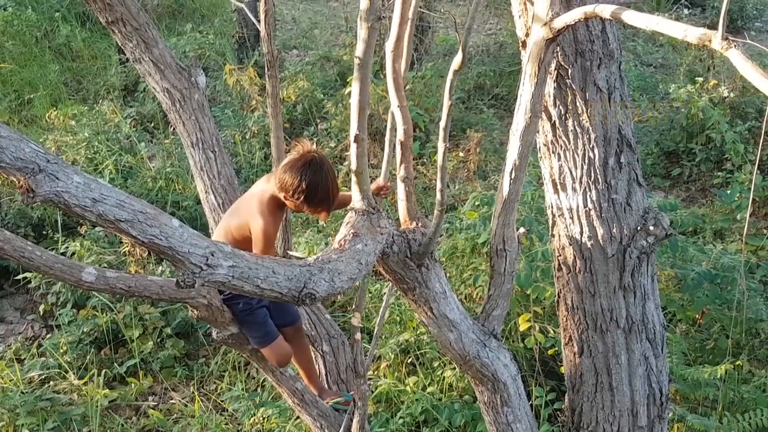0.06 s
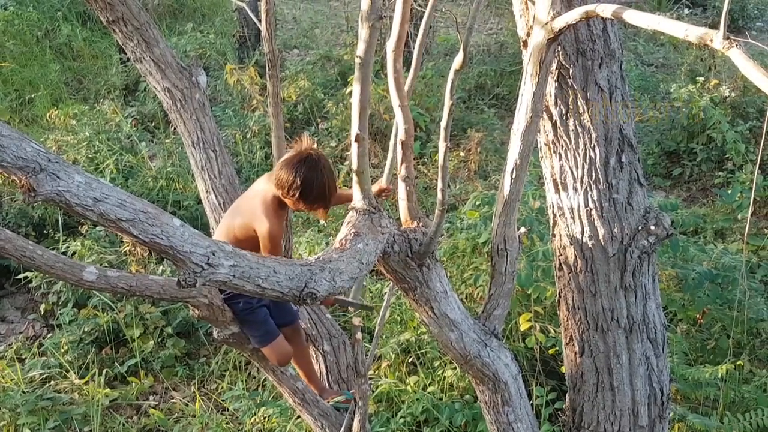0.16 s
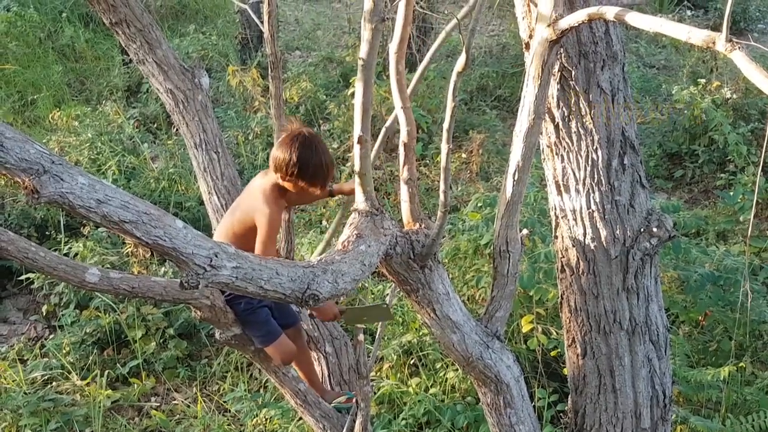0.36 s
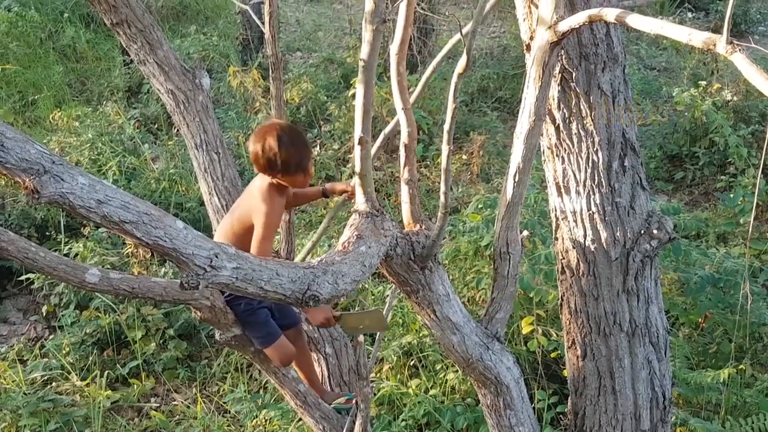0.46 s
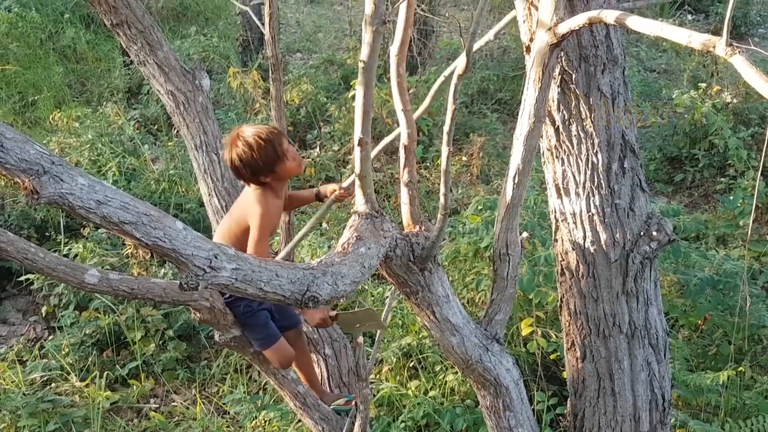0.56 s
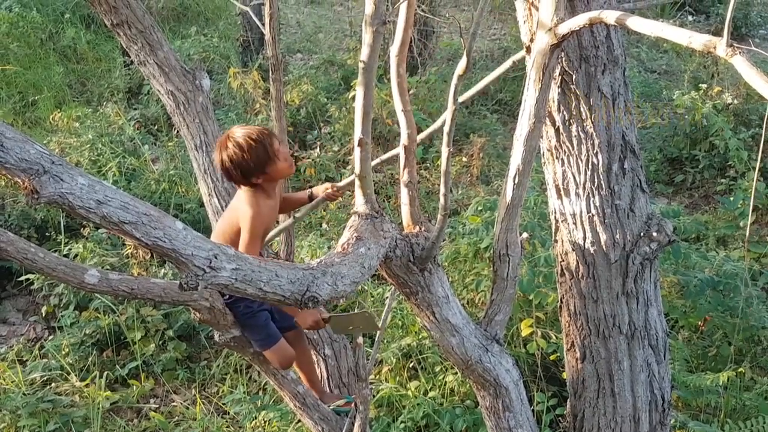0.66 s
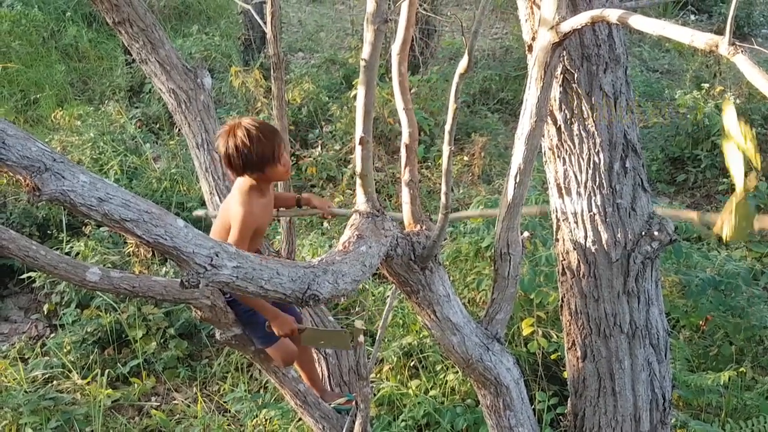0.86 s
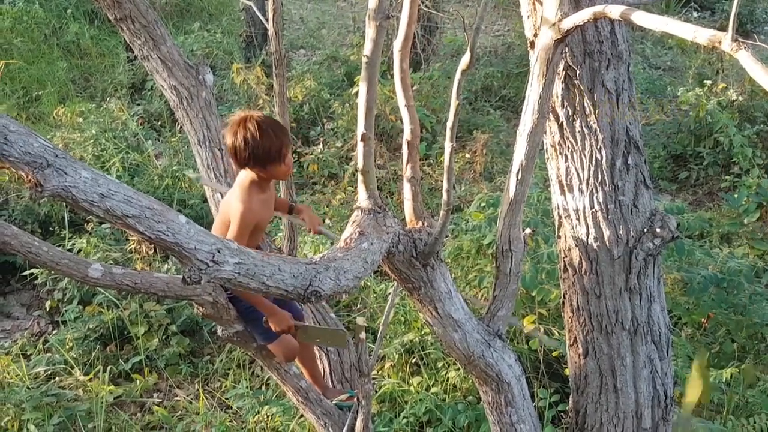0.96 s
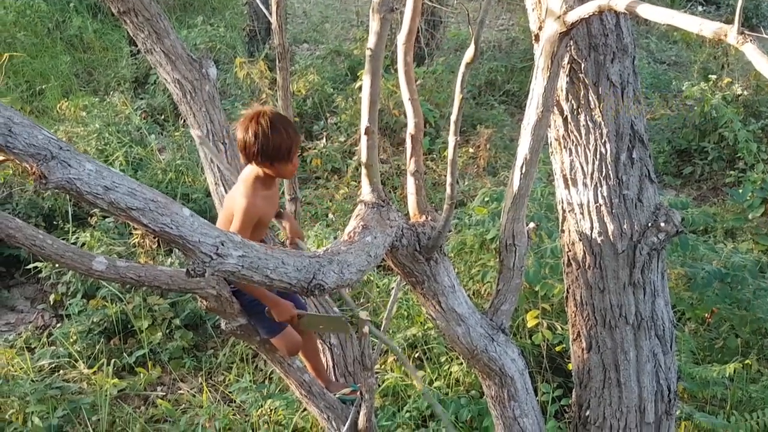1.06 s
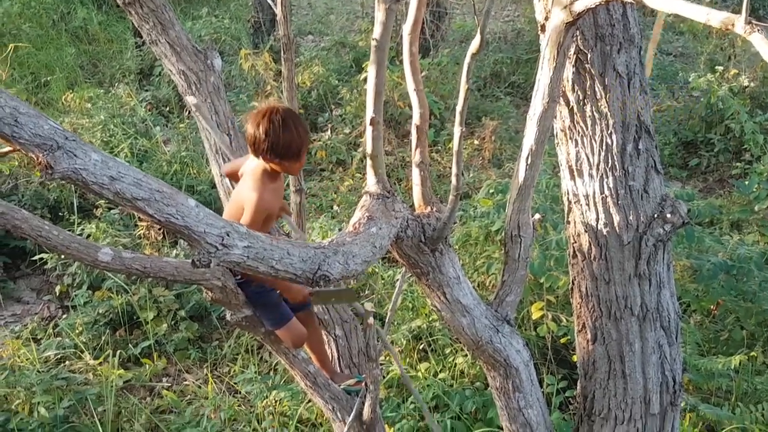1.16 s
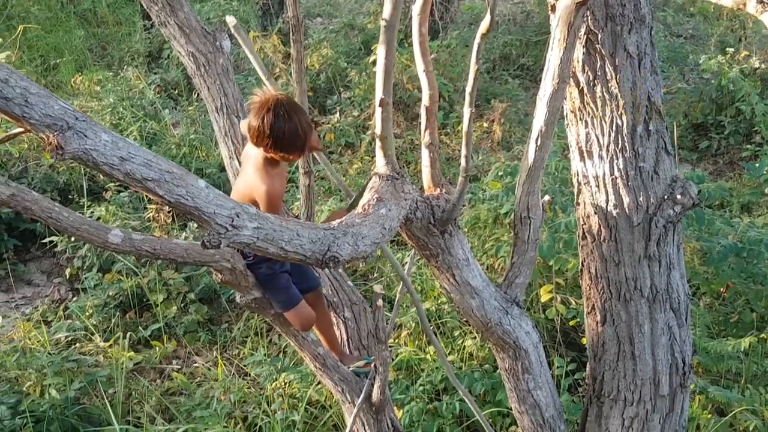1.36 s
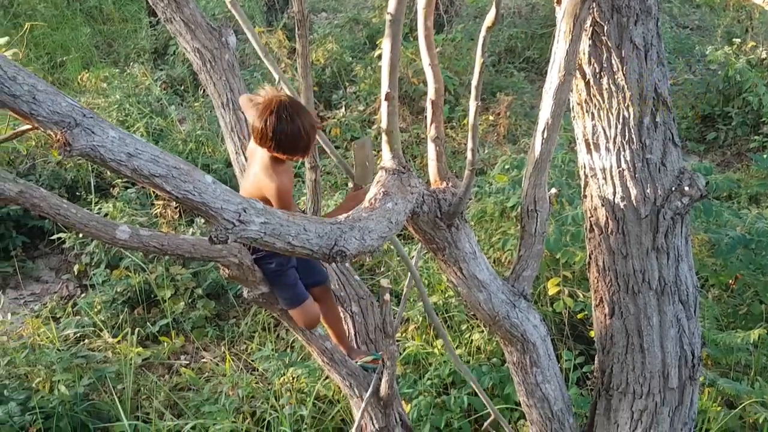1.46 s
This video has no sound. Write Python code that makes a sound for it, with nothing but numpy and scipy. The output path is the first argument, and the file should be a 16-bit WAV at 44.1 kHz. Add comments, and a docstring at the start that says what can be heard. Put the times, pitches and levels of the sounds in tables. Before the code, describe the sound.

One sharp wooden crack rings out in woodland as a branch gives way. Leaves rustle, twigs tick and the loose branch bumps and knocks on the tree, with a quiet rumble and light breeze underneath.

```python
"""Outdoors in a tree, a half-sawn branch is broken off and dragged out through the leaves. Its last fibres give
way in one sharp crack, which rings in the wood and echoes off the trees around. Leaves swish as they brush
past, small twigs snap, a leaf squeaks faintly as it scrapes, and the branch bumps on bark and knocks against a
limb. A low, steady rumble and a light breeze lie underneath."""
import sys
import numpy as np
from scipy import signal
from scipy.fft import rfft, irfft
from scipy.io import wavfile
from scipy.ndimage import uniform_filter1d

SR = 44100
rng = np.random.default_rng(int(sys.argv[2]) if len(sys.argv) > 2 else 0)


def wav_out(sig):
    """Save sig, one row per channel (or a flat mono array), as 16-bit PCM at SR to the path in sys.argv[1]."""
    wavfile.write(sys.argv[1], SR, np.round(np.clip(np.atleast_2d(sig).T, -1, 1) * 32767).astype(np.int16))


N = 66150   # 1.5 seconds
TIME = np.arange(N) / SR


def amp(db):
    """Turn decibels into a number to multiply by."""
    return 10 ** (np.asarray(db) / 20)


def unit(x):
    """Scale a signal to an average (rms) level of 1."""
    return x / np.sqrt(np.mean(x ** 2) + 1e-20)


def per_bin(points):
    """Read a (frequency, value) table at every frequency of a double-length spectrum."""
    hz, value = np.transpose(points)
    bin_hz = np.arange(N + 1) * SR / (2 * N)
    return np.interp(np.log(bin_hz + 1), np.log(hz), value)


def colour(x, points):
    """A tone control that follows a table of (frequency [Hz], level [dB])."""
    cepstrum = irfft(np.log(amp(per_bin(points))))
    index = np.arange(2 * N)
    fold = 1 + np.sign(N - index) * (index > 0)   # so that nothing sounds before its cause
    response = np.exp(rfft(cepstrum * fold))
    return irfft(rfft(x, 2 * N) * response)[..., :N]


def spread(pair):
    """Turn two unrelated signals into left and right: alike in the bass, unrelated in the treble."""
    # how alike the two sides are: (frequency [Hz], likeness [0 to 1])
    likeness = [(50, 1), (300, 0.96), (1000, 0.51), (2200, 0.39), (3500, 0.085), (6000, 0.01),
                (16000, 0.017)]
    alike = np.clip(per_bin(likeness), -.99, .99)
    mid, side = rfft(pair, 2 * N) * np.sqrt([(1 + alike) / 2, (1 - alike) / 2])
    return irfft(np.array([mid + side, mid - side]))[:, :N]


def noise():
    """White noise that comes from all around."""
    return spread(rng.standard_normal((2, N)))


def dying(t60):
    """A fade that loses 60 dB in t60 seconds, its fade time."""
    return np.exp(-np.log(1000) * TIME / t60)


def clicks(rows):
    """One click for each row of (time [s], level [dB])."""
    seconds, db = np.transpose(rows)
    return np.bincount((seconds * SR).astype(int), amp(db), N)[:N]


def ring(x, modes):
    """Let x set off fading tones, each given as (pitch [Hz], level [dB], fade time [s])."""
    response = sum(amp(db) * dying(t60) * np.cos(2 * np.pi * hz * TIME) for hz, db, t60 in modes)
    return signal.fftconvolve(x, response)[:N]


def smear(x, envelope):
    """Blur every click in x into a stereo burst of noise shaped like the envelope."""
    burst = noise() * envelope / np.sqrt(np.sum(envelope ** 2))
    return signal.fftconvolve(np.atleast_2d(x), burst, axes=1)[:, :N]


def woodland(x):
    """Dense echoes from near trunks and leaves, and a faint longer tail from trees farther off."""
    near, far = dying(t60=0.15), amp(-19.5) * dying(t60=0.95)
    return smear(x, near + far)


def air():
    """A distant rumble with a faint hiss, growing slightly towards the end."""
    # tone of the rumble: (frequency [Hz], level [dB])
    air_tone = [(20, -23), (40, -7), (70, 0), (120, -1), (180, -2.5), (270, -1.5), (480, -3), (750, -11.5),
                (1400, -16.5), (3000, -24.5), (7000, -30), (13000, -34.5), (16000, -32.5)]
    # its loudness: (time [s], level [dB])
    air_level = [(0, -52.5), (.7, -52.5), (1.35, -51), (1.5, -49.5)]
    loudness = amp(np.interp(TIME, *np.transpose(air_level)))
    return loudness * unit(colour(noise(), air_tone))


def breeze():
    """Light wind buffets left and right separately and picks up at the end."""
    # strength of the wind: (time [s], level [dB])
    wind_level = [(0, -64.5), (.6, -68.5), (1.3, -68), (1.5, -51)]
    # its deep tone: (frequency [Hz], level [dB])
    wind_tone = [(20, -9), (70, -4), (150, -5.5), (400, -16), (2000, -50)]
    loudness = amp(np.interp(TIME, *np.transpose(wind_level)))
    return loudness * unit(colour(rng.standard_normal((2, N)), wind_tone))


def friction(tone):
    """Rubbing: many tiny contacts of uneven size over a soft hiss, fluttering in loudness."""
    contacts_per_s, size_spread_db, hiss_db, flutter_db = 6000, 2.8, -3, 1.27
    sizes = amp(size_spread_db * np.minimum(rng.exponential(1, (2, N)), 5))
    signs = rng.choice([-1, 1], (2, N))
    touching = rng.random((2, N)) < contacts_per_s / SR
    contacts = spread(unit(sizes * signs * touching))
    flutter = unit(uniform_filter1d(rng.standard_normal(N), size=260))   # clumps of about 6 ms
    rubbing = (contacts + amp(hiss_db) * noise()) * amp(flutter_db * flutter)
    return unit(colour(rubbing, tone))


def foliage():
    """Leaves hiss and stems scrape lower as they brush past; each swish swells and fades."""
    # swishes: (peak time [s], leaf level [dB], rise [s], fall [s], stem level [dB])
    swishes = [(0.02, -52.5, 0.088, 0.084, -82), (0.273, -43, 0.017, 0.081, -63),
               (0.391, -54.5, .09, 0.29, -59.5), (0.62, -58.5, 0.13, 0.22, -69),
               (0.737, -43.5, 0.035, 0.11, -48), (0.823, -48, 0.17, 0.06, -57),
               (0.949, -51, 0.098, 0.14, -56.5), (1.018, -47.5, 0.048, 0.015, -66),
               (1.084, -34.5, 0.047, 0.14, -51.5), (1.152, -32, 0.054, 0.086, -44),
               (1.271, -48.5, 0.24, 0.27, -56), (1.464, -49, 0.15, 0.15, -67)]
    # tone of the leaves: (frequency [Hz], level [dB])
    leaf_tone = [(200, -8.5), (800, -5.5), (1800, -2), (3400, 2), (6000, 1), (10500, 0), (13500, -1),
                 (16000, -14)]
    # tone of the stems: (frequency [Hz], level [dB])
    stem_tone = [(80, -26.5), (200, 3), (400, 4.5), (750, -6), (1500, 0), (3300, -9), (6000, -15),
                 (16000, -65)]
    leaf_power = stem_power = 0
    for peak, leaf_db, rise, fall, stem_db in swishes:
        swell = np.exp(-2 * np.maximum((peak - TIME) / rise, (TIME - peak) / fall))
        leaf_power += (amp(leaf_db) * swell) ** 2
        stem_power += (amp(stem_db) * swell) ** 2
    return np.sqrt(leaf_power) * friction(leaf_tone) + np.sqrt(stem_power) * friction(stem_tone)


def bark():
    """The branch bumps dully against bark, and a leaf gives one faint, hissing squeak as it scrapes past."""
    # bumps: (time [s], level [dB])
    hits = [(0.2235, -21), (0.2640, -24), (0.7350, -24)]
    # their dull tone: (frequency [Hz], level [dB])
    bump_tone = [(80, -24), (250, 5), (430, 6), (620, -11), (1050, -12), (2000, -12), (5000, -28),
                 (16000, -45)]
    bumps = colour(smear(clicks(hits), dying(t60=.015)), bump_tone)
    squeak_at_s, width_s, squeak_hz, fade_s, squeak_db = .85, 0.014, 4870, 0.006, -53.5
    squeak = unit(np.array([ring(side, [(squeak_hz, 0, fade_s)]) for side in noise()]))
    swell = np.exp(-((TIME - squeak_at_s) / width_s) ** 2)
    return bumps + amp(squeak_db) * swell * squeak


def twigs():
    """Each twig snaps with a splintering tick that rings briefly; thin, high twigs have little bass."""
    # snapping twigs: (time [s], level [dB], pitch [Hz])
    snaps = [(0.357, -22.5, 5150), (0.3961, -29, 4500), (0.5965, -32.5, 9000), (0.645, -33, 10000),
             (0.7152, -22.5, 9000), (0.7234, -14.5, 4000), (0.7360, -22, 3950), (0.824, -28, 11500),
             (0.9198, -22.5, 11100), (0.9978, -20, 9000), (1.0015, -17.5, 7800), (1.0105, -23, 10000),
             (1.0177, -17, 8900), (1.0487, -20, 11000)]
    # tone of all the ticks: (frequency [Hz], level [dB])
    twig_tone = [(200, -13), (1200, 3), (3000, -3), (5500, -2), (8500, 0.5), (12000, -1), (16000, -8)]
    ring_db, ring_cycles, echo_db = -6, 5.8, -6.5
    ticks = 0
    for start, db, hz in snaps:
        bass_cut = signal.butter(1, 0.44 * hz, "high", fs=SR, output="sos")
        tick = signal.sosfilt(bass_cut, clicks([(start, db)]))
        ticks += tick + ring(tick, [(hz, ring_db, ring_cycles / hz)])
    splinters = smear(ticks, dying(t60=0.0083))
    return colour(splinters + amp(echo_db) * woodland(ticks), twig_tone)


def knocks():
    """The loose branch bounces on a limb and rings like a struck stick."""
    # knocks on the limb: (time [s], level [dB])
    hits = [(0.9200, -57), (1.0205, -48), (1.0600, -44), (1.0650, -36.5), (1.0802, -30.5), (1.0830, -39),
            (1.3280, -51)]
    # the stick's own tones: (pitch [Hz], level [dB], fade time [s])
    stick_modes = [(980, -17, .02), (1447, 0.5, 0.017), (1770, -14, 0.014), (2270, -5, 0.037),
                   (2840, -5, .018), (3264, -6.5, 0.035), (3470, -4, 0.025), (3960, -9, 0.022)]
    stick = ring(clicks(hits), stick_modes)
    return stick + amp(-6) * woodland(stick)


def disperse(x):
    """The wood lets one band of treble out slightly late, drawing a click into a tiny chirp."""
    centre_hz, width_hz = 9200, 3100
    radius = np.exp(-np.pi * width_hz / SR)
    angle = 2 * np.pi * centre_hz / SR
    poles = [1, -2 * radius * np.cos(angle), radius ** 2]
    return signal.lfilter(poles[::-1], poles, x)   # changes timing only, not loudness


def crack():
    """The last fibres break within two milliseconds; the wood rings and the trees echo."""
    # fibres giving way: (time [s], level [dB])
    fractures = [(0.21282, -20.5), (0.21332, -26), (0.21356, -18.5), (0.21388, -1.5), (0.21428, -26)]
    # the breaking wood's own tones: (pitch [Hz], level [dB], fade time [s])
    wood_modes = [(258, -48.5, 0.11), (381, -37, .11), (456, -35.5, .1), (1118, -37, 0.064),
                  (1214, -30, .04), (1474, -30.5, 0.04), (1746, -37, 0.046), (2163, -29, 0.042),
                  (2877, -26.5, 0.032), (3190, -19, 0.011), (4370, -16.5, 0.011), (5030, -10.5, 0.0056),
                  (5760, -38, 0.0069), (8300, -19.5, 0.0043)]
    # tone of the echoes: (frequency [Hz], level [dB])
    echo_tone = [(100, -11), (250, -1), (420, 11), (600, -1), (1150, 4.5), (2000, -1), (3000, 1),
                 (3900, 3.5), (5000, 7.5), (7000, 2.5), (13000, 1.5), (16000, -8)]
    breaks = clicks(fractures)
    bass_cut = signal.butter(2, 262, "high", fs=SR, output="sos")   # a thin branch gives off little bass
    snap = amp(-22) * signal.sosfilt(bass_cut, breaks)
    direct = disperse(snap + ring(breaks, wood_modes))
    echoes = amp(3.5) * colour(woodland(breaks), echo_tone)
    return direct + echoes


def scene():
    """Add all the sounds together, in stereo."""
    return crack() + foliage() + twigs() + knocks() + air() + breeze() + bark()


def record(dry):
    """Make the left side duller than the right and cut the treble above 16 kHz."""
    # balance of the two sides: (frequency [Hz], left minus right [dB])
    balance = [(100, 0.5), (2000, .5), (4500, -1.5), (7000, -2), (9000, -6), (12000, -6), (16000, 1)]
    left = colour(dry[0], [(hz, db / 2) for hz, db in balance])
    right = colour(dry[1], [(hz, -db / 2) for hz, db in balance])
    treble_cut = signal.ellip(10, .3, 80, 16000, fs=SR, output="sos")
    return signal.sosfilt(treble_cut, [left, right])


dry = scene()
out = record(dry)
wav_out(out)
```